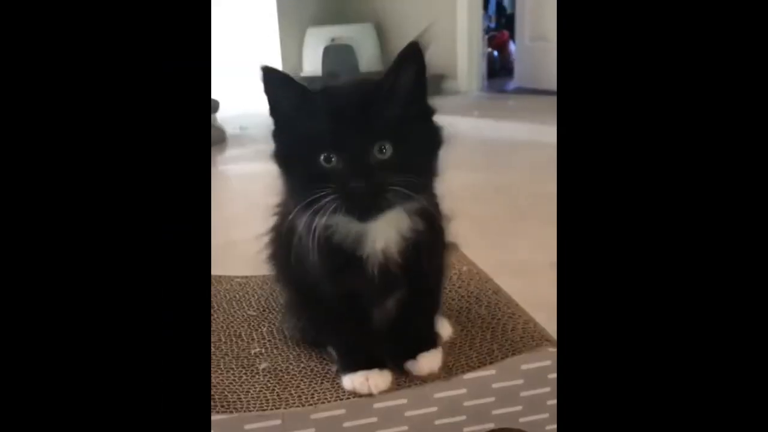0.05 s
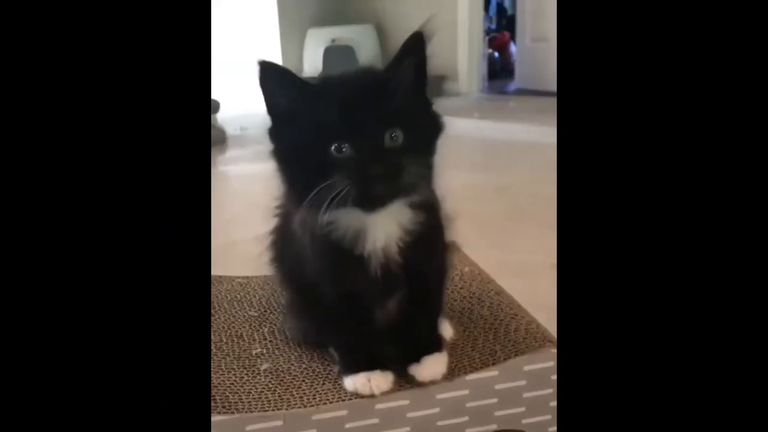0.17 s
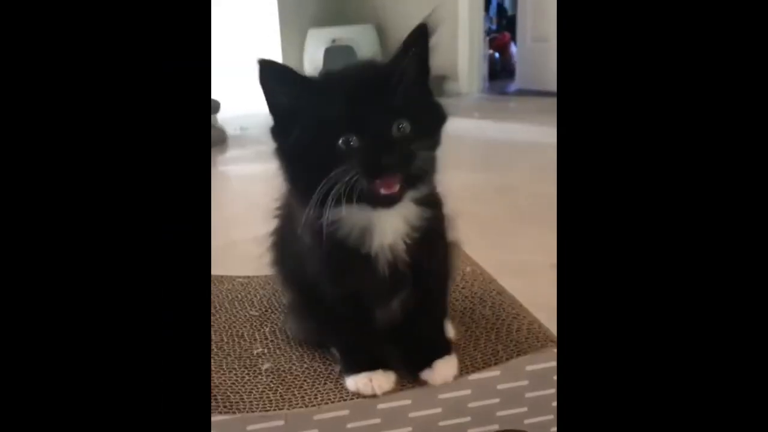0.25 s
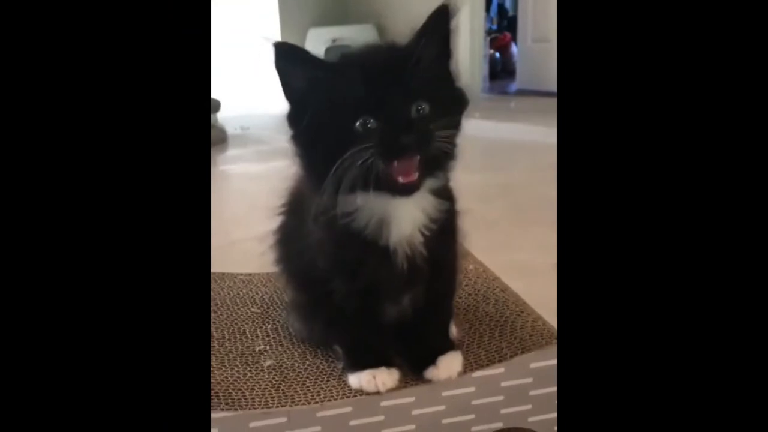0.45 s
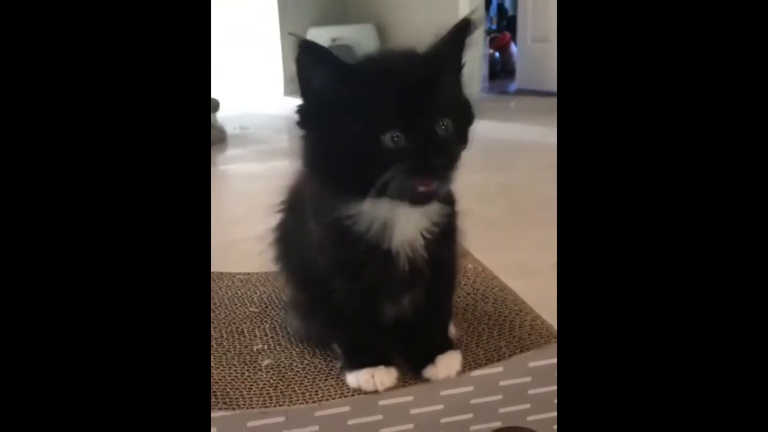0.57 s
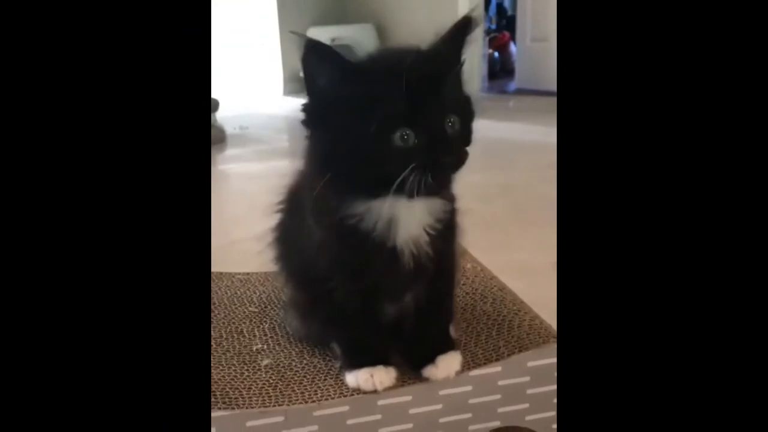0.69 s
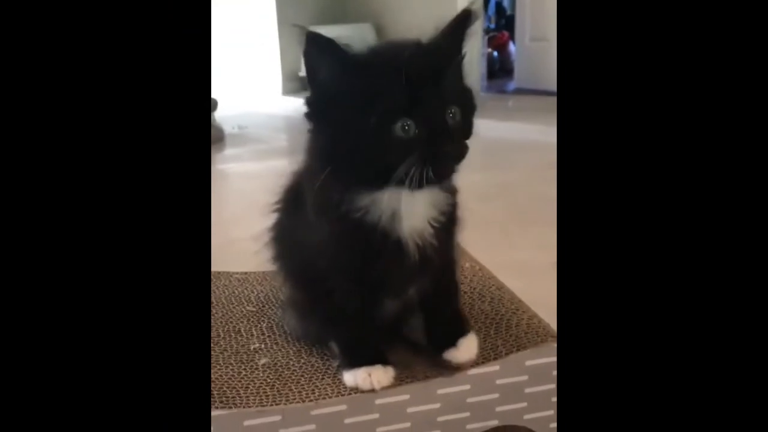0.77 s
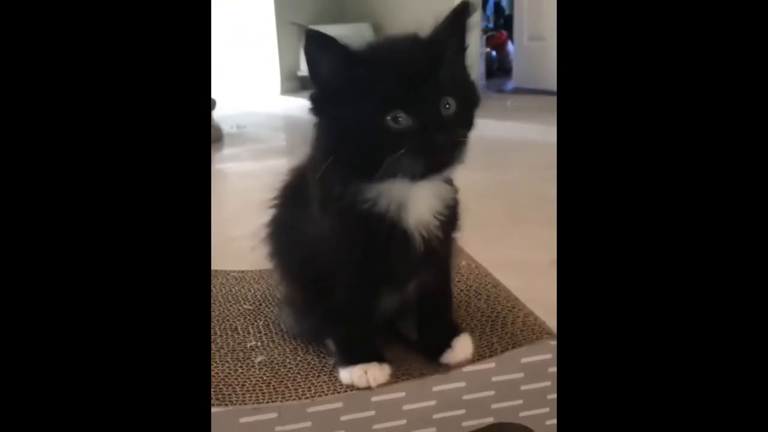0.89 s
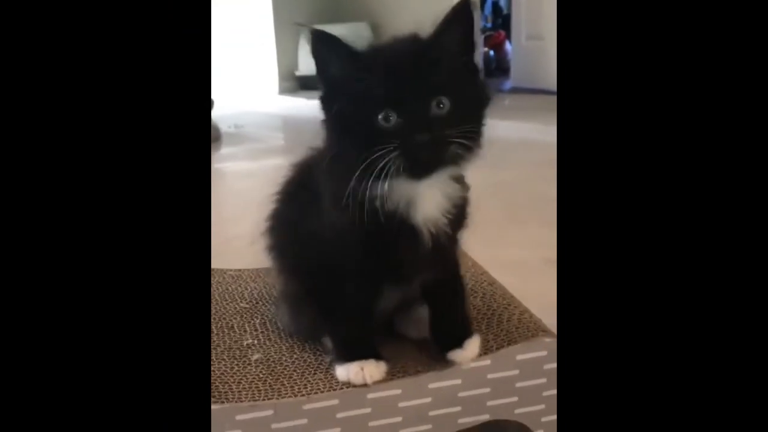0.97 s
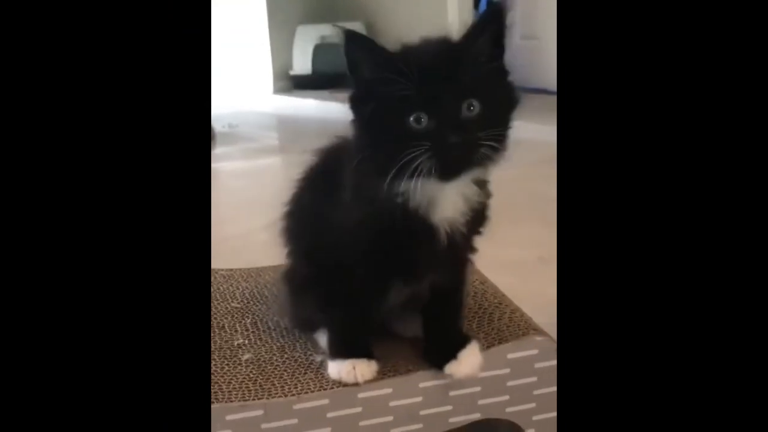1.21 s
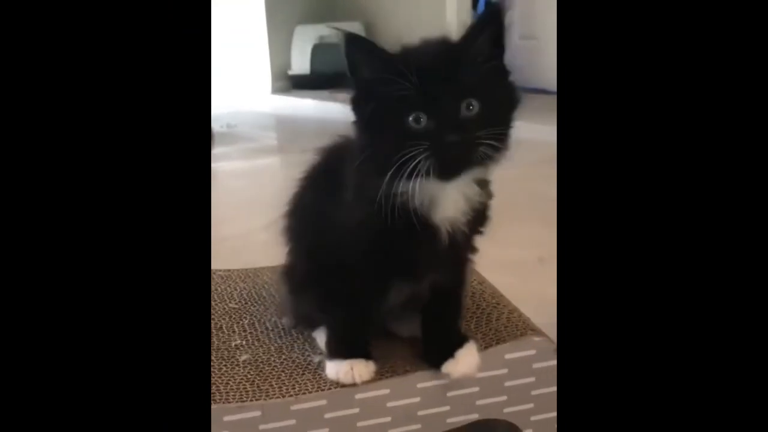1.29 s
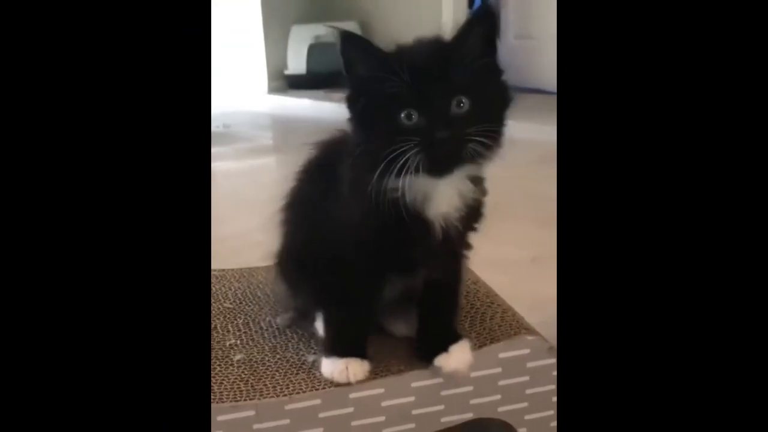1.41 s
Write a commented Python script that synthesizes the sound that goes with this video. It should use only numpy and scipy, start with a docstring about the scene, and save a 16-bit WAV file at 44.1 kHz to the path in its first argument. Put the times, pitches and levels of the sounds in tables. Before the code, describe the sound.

One small, thin kitten meow after faint wet mouth clicks, indoors over a soft low hum

```python
"""A low hum and soft room noise are heard first: wavering sine tones over spectrally shaped noise.
Wet clicks of an opening mouth (decaying noise bursts) come before the meow; short catches of the voice
(gliding tones) come before it and at its end. The kitten's one short, high, close meow rises, holds and
sinks: harmonics weighted by throat, mouth and a close floor reflection, with a little air.
Faint rustles (grainy noise) accompany it, and sparse reflections form the room."""
import sys
import numpy as np
from scipy import signal
from scipy.fft import rfft, irfft
from scipy.io import wavfile
from scipy.ndimage import uniform_filter1d

SR = 44100
rng = np.random.default_rng(int(sys.argv[2]) if len(sys.argv) > 2 else 0)


def waveform_to_disk(signal):
    """Save audio, clipped to [-1, 1], as 16-bit WAV at the path in sys.argv[1]."""
    frames = np.transpose(np.atleast_2d(signal))
    scaled = np.clip(frames, -1, 1) * 32767
    samples = np.round(scaled).astype(np.int16)
    wavfile.write(sys.argv[1], SR, samples)


N = 63945
T = np.arange(N) / SR  # time [s]

# hum tones before waver and swell: (frequency [Hz], rms level [dB])
HUM_TONES = [(76.5, -73), (99, -61), (148.3, -72.5)]
# swell of the whole hum: (time [s], level [dB])
HUM_SWELL = [(0, -2), (.2, 3.5), (.53, 0), (.66, -4), (.75, 0), (1.12, 4), (1.22, -5), (1.44, -4.5)]
# relative spectrum of the room noise: (frequency [Hz], level [dB per Hz])
ROOM_NOISE_COLOUR = [(15, -77), (25, -38.5), (48, -16.5), (65, -11.5), (84, -10), (102, -8), (125, -18),
                     (197, -15), (401, -22.5), (470, -27), (566, -22), (757, -26.5), (1670, -32.5),
                     (1910, -37.5), (13900, -52)]
# wet clicks of the opening mouth: (start [s], level [dB], decay time constant [s], resonance [Hz])
MOUTH_CLICKS = [(0.4077, -65, .002, 2470), (0.4294, -54, 0.0016, 11200), (0.4361, -57.5, .002, 3600),
                (0.4454, -53.5, 0.003, 2900), (.449, -63, 0.0071, 3000), (0.4571, -51, 0.003, 4350),
                (0.4598, -49.5, 0.0012, 4270)]
# brief catches before the meow and at its end: (start [s], length [s], starting pitch [Hz], level [dB])
VOICE_CATCHES = [(.4095, 0.0062, 920, -53), (.4468, 0.018, 1088, -46.5), (1.157, 0.0038, 1060, -53),
                 (1.171, 0.0071, 870, -58)]
# pitch of the meow before smoothing, jitter and final flick: (time [s], pitch [Hz])
MEOW_PITCH = [(0.466, 970.2), (0.488, 1027), (0.508, 1019), (0.516, 1061), (0.55, 1121), (0.604, 1191),
              (0.65, 1182), (0.71, 1187), (0.72, 1192), (0.76, 1187), (0.812, 1104), (0.95, 957.3),
              (1.012, 864.6), (1.112, 774), (1.148, 718), (1.175, 786.9)]
# level of the fundamental: (time [s], level [dB])
FUNDAMENTAL_LEVEL = [(.462, -44), (.473, -40), (.53, -50.5), (.555, -58), (.725, -58), (.765, -50),
                     (.84, -42), (.92, -36.5), (.96, -38.5), (1.02, -43.5), (1.08, -48.5), (1.11, -49.5),
                     (1.135, -52.5), (1.175, -56.5)]
# common gain of overtones and air: (time [s], level [dB])
OVERTONE_GAIN = [(.462, 0), (.49, 1.5), (.55, -0.5), (.585, -1), (.61, 0), (.75, 3), (.82, 3), (.95, 0),
                 (1.05, -3), (1.145, -2.5), (1.16, -3), (1.175, -5)]
# filtering by throat, mouth and a close floor reflection, before the overtone gain:
# (frequency [Hz], level [dB])
OVERTONE_RESPONSE = [(1400, -65), (1620, -55), (1850, -56), (2030, -67), (2200, -59.5), (2380, -52),
                     (2550, -59.5), (2850, -57), (3060, -62), (3300, -68), (3540, -58.5), (3900, -66.5),
                     (4300, -81.5), (4750, -71), (4950, -79.5), (5400, -68), (5870, -62.5), (6350, -72.5),
                     (6750, -70), (7200, -87), (7700, -80), (8150, -86.5), (8600, -76), (9500, -85),
                     (11000, -102)]
# relative spectrum of air passing the vocal folds: (frequency [Hz], level [dB per Hz])
AIR_COLOUR = [(600, -23), (1000, 23.5), (1400, -4), (3000, -6), (4400, -24), (6000, -10), (8500, -21),
              (10500, -7.5), (13000, -7)]
# soft rustles as the kitten shifts: (centre [s], Gaussian spread [s], level [dB])
RUSTLES = [(0.48, 0.05, -78.5), (0.962, 0.02, -74.5), (1.06, .04, -80), (1.177, 0.021, -78.5),
           (1.245, 0.014, -76), (1.312, 0.021, -82.5), (1.344, 0.0083, -77.5)]
# relative spectrum of the rustles: (frequency [Hz], level [dB per Hz])
RUSTLE_COLOUR = [(300, -12), (1000, -0.5), (3000, -1), (6000, -14), (8500, 1.5), (10300, -3), (12300, 5.5),
                 (14000, -8)]

HUM_WAVER_DB, HUM_WAVER_HZ = 1.0, 7.1  # rms level waver and the corner of its rate
HUM_DRIFT = 0.01  # rms pitch drift, as a share of the pitch
ROOM_NOISE_DB = -63  # rms
CLICK_RISE_S, CLICK_OCTAVES = 0.00041, 0.42  # onset time; spread of the resonance
CLICK_SKIRT = 0.32  # flat gain added to the unit resonance peak
CATCH_GLIDE = 0.14  # share by which a catch rises in pitch
CATCH_OVERTONE_DB = -14.5  # second harmonic; the third has half its amplitude
START_S, END_S, ATTACK_S, RELEASE_S = .462, 1.178, 0.0045, 0.0029
JITTER, JITTER_HZ = 0.0042, 89  # rms share of the pitch; corner of its rate
SHIMMER_DB, SHIMMER_HZ = 1.4, 34.3  # rms at the fourth harmonic; corner of its rate
AIR_DB = -76  # rms before pulsing and overtone gain
# the folds go slack: duller and rougher, with jitter added as an rms share of the pitch
SLACK_S, SLACK_FADE_S, SLACK_DB_PER_OCT, SLACK_JITTER = 1.153, .005, -4, 0.039
FLICK_S, FLICK_RISE = 1.166, 0.21  # the pitch flicks up by this share as the voice stops
# the closing mouth damps its main resonance, halfway at CLOSING_S
CLOSING_S, CLOSING_HZ, CLOSING_WIDTH_HZ, CLOSING_DB = 1.11, 2310, 220, -11
# the middle overtones are weak until the voice breaks upward
EARLY_S, EARLY_HZ, EARLY_WIDTH_HZ, EARLY_DB = .512, 3840, 880, -5.5
RUSTLE_GRAIN_DB, RUSTLE_GRAIN_HZ = 2, 400  # rms level grain and the corner of its rate
ROOM_DB, ROOM_T60_S, ROOM_DELAY_S = -14.5, 0.3, .005
REFLECTIONS_PER_S = 2000  # mean density
BAND_EDGE_HZ = 14050


def amp(db):
    """Logarithmic level: decibels become an amplitude ratio."""
    return 10 ** (np.asarray(db) / 20)


def unit(x):
    """Normalisation of power: the signal is scaled to rms 1."""
    return x / np.sqrt(np.mean(x ** 2) + 1e-20)


def curve(points):
    """Linear interpolation: (time, value) points are joined over the whole scene."""
    return np.interp(T, *np.transpose(points))


def spectrum(points, hz):
    """Logarithmic frequency scale: (frequency, level) points are interpolated along it."""
    f, db = np.transpose(points)
    return np.interp(np.log(hz + 1), np.log(f + 1), db)


def noise(gain):
    """Spectral shaping: white noise is weighted by gain(frequency) and brought to rms 1."""
    white = rfft(rng.standard_normal(N))
    frequencies = np.fft.rfftfreq(N, 1 / SR)
    return unit(irfft(white * gain(frequencies), N))


def wander(hz):
    """Low-pass random motion: fluctuation of rms 1, mostly slower than the given rate."""
    return noise(lambda f: 1 / (1 + (f / hz) ** 4))


def hum():
    """Superposition: low sine tones waver in level and pitch and swell together."""
    tones = np.zeros(N)
    for hz, db in HUM_TONES:
        wavering_hz = hz * (1 + HUM_DRIFT * wander(HUM_WAVER_HZ))
        turns = np.cumsum(wavering_hz) / SR + rng.random()
        level = amp(db + HUM_WAVER_DB * wander(HUM_WAVER_HZ))
        tones += level * np.sqrt(2) * np.sin(2 * np.pi * turns)  # sqrt(2): rms to peak
    return amp(curve(HUM_SWELL)) * tones


def room_noise():
    """Stationary random noise: a fixed spectrum gives the soft background its colour."""
    return amp(ROOM_NOISE_DB) * noise(lambda f: amp(spectrum(ROOM_NOISE_COLOUR, f)))


def mouth_clicks():
    """Impulsive excitation: tongue and lips part in tiny bursts, each with one broad resonance."""
    out = np.zeros(N)
    for start, db, decay, hz in MOUTH_CLICKS:
        age = np.maximum(T - start, 0)
        envelope = np.minimum(age / CLICK_RISE_S, 1) * np.exp(-age / decay)

        def resonance(f):
            """Gaussian resonance in octaves above a flat skirt."""
            octaves = np.log2((f + 1) / hz)
            return np.exp(-(octaves / CLICK_OCTAVES) ** 2 / 2) + CLICK_SKIRT

        out += amp(db) * envelope * noise(resonance)
    return out


def voice_catches():
    """Brief self-oscillation: the folds swing for a few cycles and stop."""
    out = np.zeros(N)
    for start, length, hz, db in VOICE_CATCHES:
        u = np.clip((T - start) / length, 0, 1)  # progress through the catch
        phase = 2 * np.pi * hz * (T - start) * (1 + CATCH_GLIDE * u / 2)
        overtones = np.sin(2 * phase) + .5 * np.sin(3 * phase)
        tone = np.sin(phase) + amp(CATCH_OVERTONE_DB) * overtones
        out += amp(db) * np.sin(np.pi * u ** 0.53) * tone  # early peak, silent at both ends
    return out


def meow():
    """Source and filter: a gliding harmonic voice, with a little air, has its overtones filtered."""
    slack = np.clip((T - SLACK_S) / SLACK_FADE_S, 0, 1)
    flick = np.clip((T - FLICK_S) / (END_S - FLICK_S), 0, 1)
    jitter = (JITTER + SLACK_JITTER * slack) * wander(JITTER_HZ)
    hz = uniform_filter1d(curve(MEOW_PITCH), size=200) * (1 + jitter) * (1 + FLICK_RISE * flick)
    phase = 2 * np.pi * np.cumsum(hz) / SR
    opening = np.clip((T - START_S) / ATTACK_S, 0, 1)
    ending = np.clip((END_S - T) / RELEASE_S, 0, 1)
    closing = np.clip((T - CLOSING_S) / .1 + .5, 0, 1)

    air = amp(AIR_DB) * noise(lambda f: amp(spectrum(AIR_COLOUR, f)))
    upper = air * (1 + .5 * np.cos(phase))  # air pulses with the voice
    for k in range(2, 14):  # harmonic number
        overtone_hz = k * hz
        closing_dip = np.exp(-((overtone_hz - CLOSING_HZ) / CLOSING_WIDTH_HZ) ** 2)
        early_dip = np.exp(-((overtone_hz - EARLY_HZ) / EARLY_WIDTH_HZ) ** 2)
        damping = CLOSING_DB * closing * closing_dip + EARLY_DB * (T < EARLY_S) * early_dip
        shimmer = SHIMMER_DB * np.sqrt(k) / 2 * wander(SHIMMER_HZ)
        dulling = SLACK_DB_PER_OCT * slack * np.log2(k)
        db = spectrum(OVERTONE_RESPONSE, overtone_hz) + damping + shimmer + dulling
        upper = upper + amp(db) * np.cos(k * phase + 2 * np.pi * rng.random())
    fundamental = amp(curve(FUNDAMENTAL_LEVEL)) * np.cos(phase)
    return opening * ending * (fundamental + amp(curve(OVERTONE_GAIN)) * upper)


def rustles():
    """Amplitude-modulated friction noise: faint, grainy brushing of fur and paws."""
    level = sum(amp(db) * np.exp(-((T - s) / spread) ** 2 / 2) for s, spread, db in RUSTLES)
    brushing = noise(lambda f: amp(spectrum(RUSTLE_COLOUR, f)))
    grain = amp(RUSTLE_GRAIN_DB * wander(RUSTLE_GRAIN_HZ))
    return level * unit(brushing * grain)


def room_reflections(x):
    """Reverberation by convolution: scattered reflections form a short, faint, decaying tail."""
    strengths = rng.standard_normal(N)
    arrivals = (rng.random(N) < REFLECTIONS_PER_S / SR) * (T > ROOM_DELAY_S)
    taps = strengths * arrivals * amp(-60 * T / ROOM_T60_S)
    taps = taps / np.linalg.norm(taps)
    return amp(ROOM_DB) * signal.fftconvolve(x, taps)[:N]


def scene():
    """Linear superposition: the kitten, its reflections and the background add."""
    kitten = meow() + voice_catches() + mouth_clicks() + rustles()
    background = room_noise()
    reflections = room_reflections(kitten)
    return (kitten + reflections + hum() + background)[None]


def record(dry):
    """Band limitation: a linear-phase low-pass filter removes the highest frequencies."""
    lowpass = signal.firwin(511, BAND_EDGE_HZ, window=("kaiser", 9), fs=SR)
    return signal.oaconvolve(dry, lowpass[None], "same")


dry = scene()
out = record(dry)
waveform_to_disk(out)
```